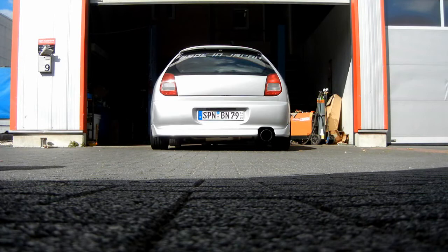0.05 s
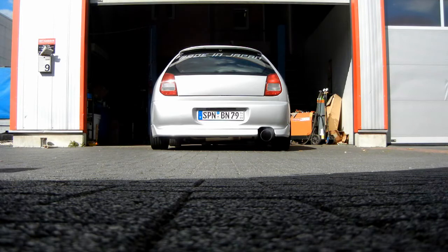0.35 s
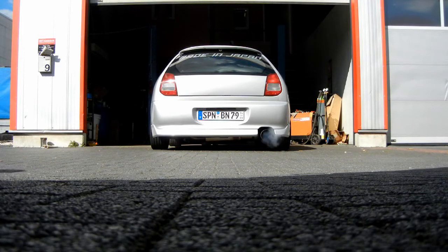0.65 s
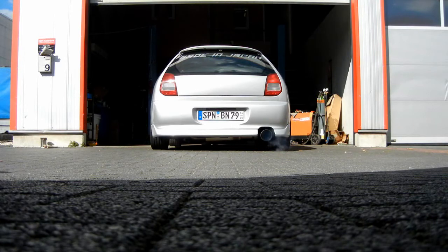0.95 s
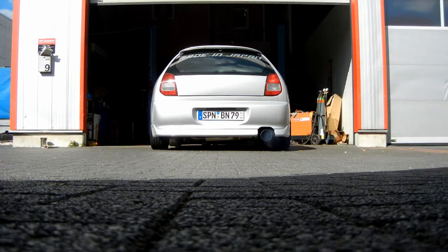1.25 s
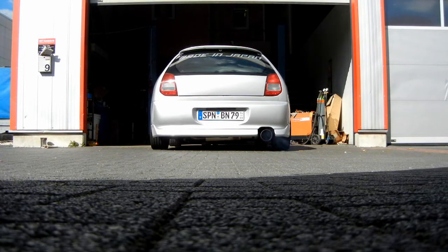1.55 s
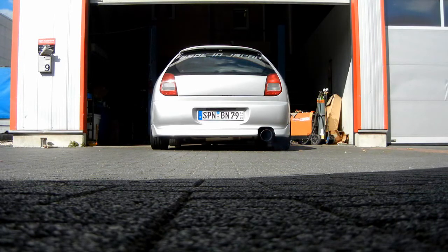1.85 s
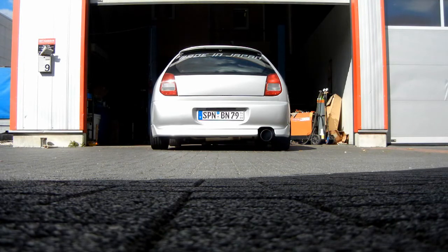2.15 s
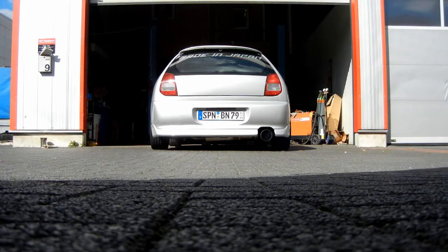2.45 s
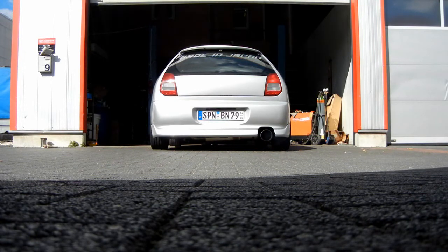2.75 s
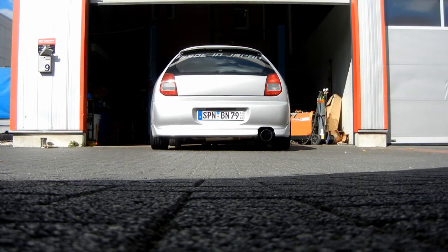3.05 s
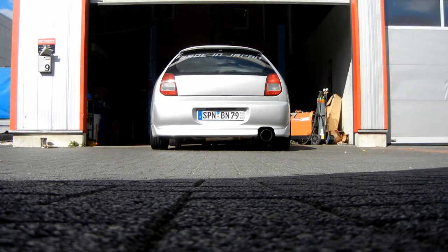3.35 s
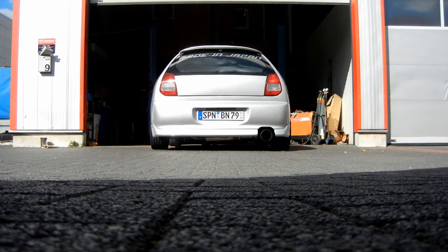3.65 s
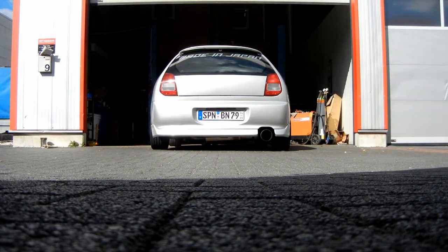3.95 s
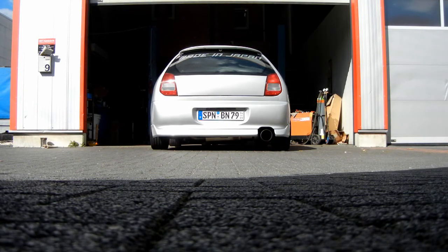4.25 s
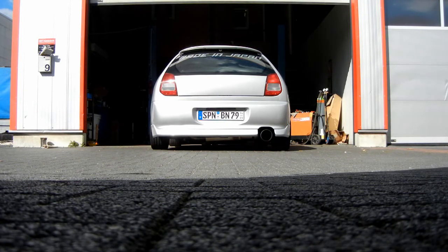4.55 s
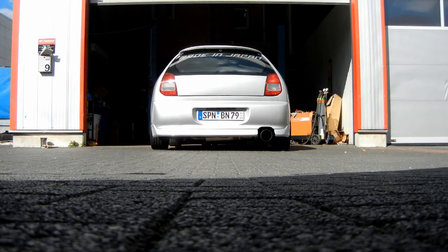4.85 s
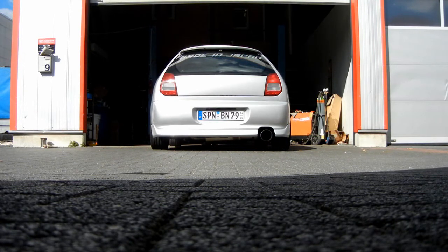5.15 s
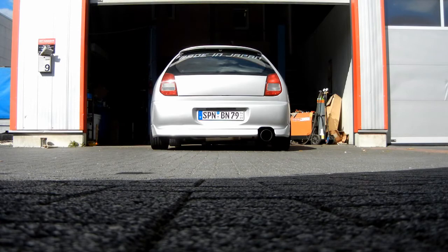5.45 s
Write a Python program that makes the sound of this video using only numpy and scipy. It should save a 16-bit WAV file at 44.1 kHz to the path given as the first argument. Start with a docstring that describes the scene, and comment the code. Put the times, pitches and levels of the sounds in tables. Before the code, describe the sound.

Heard from behind a car parked in an open garage, one quick, raspy rev rises and breaks into a cluster of exhaust pops. The boomy four-cylinder note falls slowly, stumbling a little, until it reaches an uneven idle. Then a smaller throttle blip lifts it again and it winds back down. Belts and valves whirr softly underneath, and the garage adds a brief echo.

```python
"""A car engine revs up with a hard rasp, pops and burbles down to a lumpy idle, then revs again, more gently.
It has four cylinders and a sports exhaust, and stands in an open garage with its tail towards us.
Each firing sends a puff of gas that makes the exhaust pipe ring. On the throttle the puffs steepen into
cracking shock fronts; off it, unburnt fuel pops in the pipe. The engine's whirr comes out of the garage."""
import sys
import numpy as np
from scipy import signal
from scipy.fft import rfft, irfft
from scipy.io import wavfile
from scipy.ndimage import uniform_filter1d

SR = 44100
rng = np.random.default_rng(int(sys.argv[2]) if len(sys.argv) > 2 else 0)


def unload_audio(sound):
    """Save the sound as a 16-bit wav file, at the path given as the first command line argument."""
    columns = np.transpose(np.atleast_2d(sound))
    # keep every value between -1 and 1, then stretch to whole-number steps
    steps = np.round(np.clip(columns, -1, 1) * 32767)
    wavfile.write(sys.argv[1], SR, steps.astype(np.int16))


N = 247401
TIME = np.arange(N) / SR

# Levels in the tables are relative: each part gets further gains later.
# how often the engine fires: t/s, f/Hz
FIRING_RATE = [(0.0, 50.9), (0.11, 53), (0.24, 70), (0.5, 125.5), (0.58, 134.5), (0.7, 136.5), (0.88, 124),
               (1.08, 113), (1.62, 88.4), (2.13, 72.6), (2.4, 68), (3.16, 53.4), (3.6, 50.2), (4.16, 49.2),
               (4.26, 56.9), (4.42, 85.4), (4.5, 92), (4.7, 91.5), (4.97, 84.3), (5.39, 70.3), (5.61, 69.4)]
# presses of the throttle: opens t/s, closes t/s, time to fade by 60 dB/s, opening (0-1)
THROTTLE_PRESSES = [(0.08, 0.548, 0.18, 0.93), (4.172, 4.37, 0.53, 0.8)]
# the cylinders in firing order: strength/dB, lateness/ms, change of strength at idle/dB
CYLINDERS = [(6, -0.29, 0), (-0.5, 0.39, -1.5), (5.5, -0.14, -0.5), (-0.5, 0.39, -0.5)]
# firings that fail: t/s, dip in level/dB
MISFIRES = [(1.14, -6.5), (1.203, -23.5), (1.585, -3), (1.65, -13), (5.44, -4)]
# how strong the left-right difference is against what both sides share: f/Hz, level/dB
STEREO_SPREAD = [(100, -10.5), (1000, -14), (2000, -13.5), (4000, -7.5), (8000, -4.5), (15000, -3)]
# tone colour of the valve gear and belts: f/Hz, level/dB
WHIRR_COLOUR = [(500, -24), (850, -0.5), (882, -10), (1020, -0.5), (1150, -6), (1430, -4), (1520, -2.5),
                (1760, -2), (2540, -12), (3160, -12.5), (4330, -24.5), (4830, -28), (5450, -30),
                (6870, -32.5), (15500, -45)]
# loudness of their whirr: t/s, level/dB
WHIRR_LEVEL = [(0, -41.5), (0.8, -42), (1.25, -45.5), (1.75, -40), (2.7, -43.5), (3.35, -50), (3.78, -49.5),
               (4.35, -40.5), (4.58, -48), (4.92, -39.5), (5.42, -38.5), (5.61, -46)]
# faint squeals of a belt: starts t/s, fades from t/s, level/dB
BELT_SQUEALS = [(2.384, 2.68, -65), (4.753, 5.4, -64)]
# tone colour of fast gas: f/Hz, level/dB
HISS_COLOUR = [(1000, -21), (3500, 1.5), (5600, 3.5), (6600, -4.5), (12000, -7), (13200, -8.5),
               (15500, -12)]
# loudness of the pulsing flow at the outlet: t/s, level/dB
THROB_LEVEL = [(0.1, -22), (0.38, -27.5), (0.66, -36.5), (1.14, -29.5), (1.25, -25), (2.05, -27.5),
               (2.42, -23), (2.92, -28.5), (3.11, -25), (3.65, -34), (4.26, -25), (4.38, -34.5),
               (5.15, -23), (5.61, -27)]
# tone colour of a shock front: f/Hz, level/dB
SHOCK_COLOUR = [(100, -16.5), (400, 4.5), (740, -0.5), (860, -5), (1030, 3.5), (1200, 0), (1650, 2),
                (2700, -7), (3450, -7.5), (4500, -21), (5560, -25), (6400, -37.5), (15500, -46)]
# single pops, mostly off the throttle: t/s, crack level/dB, kick to the tailpipe/dB
POPS = [(0.3136, -8.5, -2), (0.3383, -17, -6), (0.378, -4, -3), (0.7882, -7, 10), (0.8507, -20, -10),
        (0.866, -11, 0), (0.8824, -12.5, 1), (0.8984, -8.5, -6.5), (0.9313, -6, -11), (0.9986, -10.5, -4),
        (1.104, -17.5, 9), (1.1206, -12, 2), (1.1571, -21.5, 6.5), (1.1756, -12.5, 6), (1.229, -32.5, 5),
        (1.5345, -25, 9), (1.603, -43, 5.5), (1.665, -27, 2.5), (4.3117, -18, 1), (4.3669, -12, -11.5),
        (4.417, -12, -5.5), (5.355, -32, 4.5)]
# low notes at which the silencer rings (the boom): f/Hz, width/Hz, level/dB
SILENCER_MODES = [(146.8, 8.1, -4), (207.15, 11.3, 7), (288, 3.1, -10.5), (343.6, 12, -9),
                  (391.8, 4.7, -12)]
# middle notes of the tailpipe (the bark): f/Hz, width/Hz, level/dB
TAILPIPE_MODES = [(444.5, 42.3, 1.5), (468.9, 37.8, 7.5), (505, 120, -14)]
# overtones of the tailpipe (the blare): f/Hz, width/Hz, level/dB
OVERTONE_MODES = [(604, 39, -10), (720.7, 22.6, -1), (746.7, 41, -6.5)]
# loudness of the boom: t/s, level/dB
BOOM_LEVEL = [(0, -19), (0.2, -15.5), (0.4, -20.5), (0.53, -28.5), (0.6, -22.5), (1.12, -19.5), (1.3, -19),
              (1.65, -19.5), (2.14, -23), (2.22, -21), (2.5, -22), (2.68, -24.5), (2.82, -18), (3.1, -24),
              (4.22, -19), (4.4, -23.5), (4.8, -23), (5.02, -18), (5.2, -21), (5.6, -12)]
# loudness of the bark: t/s, level/dB
BARK_LEVEL = [(0.05, -34), (0.2, -19.5), (0.38, -32.5), (0.6, -18.5), (0.71, -36.5), (0.79, -30.5),
              (0.98, -18), (1.35, -48), (1.65, -27), (1.75, -21.5), (2.53, -35), (2.7, -23.5), (2.9, -42),
              (3.13, -30), (3.35, -41.5), (4.13, -34), (4.22, -24.5), (4.78, -27), (4.92, -22.5),
              (5.28, -22.5), (5.36, -18.5), (5.48, -28.5)]
# unburnt fuel crackling after the big rev: starts t/s, fades from t/s, time to fade by 60 dB/s
AFTERFIRE = (0.744, 0.95, 0.73)


def undb(db):
    """Turn decibels into a gain to multiply by."""
    return np.exp(np.asarray(db) * np.log(10) / 20)


def curve(table, at=TIME):
    """Join the points of a table with straight lines in time."""
    return np.interp(at, *np.transpose(table))


def unit(x):
    """Scale a sound so that its average level (rms) is 1."""
    return x / np.sqrt(np.mean(x ** 2))


def even_out(x, swell=0, size=3000):
    """Hold the level near 1, but keep a share (swell, 0-1) of its quick rises and falls."""
    quick, slow = (uniform_filter1d(uniform_filter1d(x ** 2, n), n // 2) + 1e-12
                   for n in (size, size * 10))
    return x / np.sqrt(quick ** (1 - swell) * slow ** swell)


def ring(x, response):
    """Pass a sound through something, given how that thing answers a single click."""
    return signal.fftconvolve(x, response)[:len(x)]


def colour(points, size=1024):
    """A click with the given tone colour (f/Hz, level/dB)."""
    hz, db = np.transpose(points)
    grid_hz = np.maximum(np.fft.rfftfreq(size, 1 / SR), 1)
    gains = undb(np.interp(np.log(grid_hz), np.log(hz), db))
    cepstrum = irfft(np.log(gains))
    # move the energy to the start of the click (minimum phase)
    cepstrum[1:size // 2] *= 2
    cepstrum[size // 2 + 1:] = 0
    return irfft(np.exp(rfft(cepstrum)))


def band(x, low_hz, high_hz, order=3):
    """Keep what lies between two frequencies."""
    return signal.sosfilt(signal.butter(order, [low_hz, high_hz], "band", fs=SR, output="sos"), x)


def pipe(x, modes):
    """A pipe rings at its own notes; neighbouring notes swing opposite ways at its mouth."""
    return sum((-1) ** k * undb(db) * signal.lfilter(*signal.iirpeak(hz, hz / width, SR), x)
               for k, (hz, width, db) in enumerate(modes))


def pulses(times, sizes, reach=8):
    """Clean clicks at exact times, even between two samples."""
    at = np.asarray(times)[:, None] * SR
    taps = np.floor(at).astype(int) + np.arange(1 - reach, reach + 1)
    shapes = np.sinc(taps - at) * np.sinc((taps - at) / reach)
    return np.bincount(np.clip(taps, 0, N - 1).ravel(), (shapes * sizes[:, None]).ravel(), N)


def wander(rate_hz):
    """A smooth random drift, about 1 in size."""
    step = int(SR / rate_hz)
    stairs = np.repeat(rng.standard_normal(N // step + 1), step)
    return unit(uniform_filter1d(stairs, step)[:N])


def envelope(start, stop, t60, rise_s=0.099):
    """Rise to 1, hold until stop, then fade by 60 dB every t60 seconds."""
    fallen_db = np.clip(60 * (TIME - stop) / t60, 0, 200)
    return np.clip((TIME - start) / rise_s, 0, 1) * undb(-fallen_db)


def around(at, half_s):
    """A smooth bump of height 1 around a moment."""
    return np.exp(-np.minimum(((TIME - at) / half_s) ** 2, 30))


def throttle():
    """How far the throttle is open, 0-1."""
    return sum(opening * envelope(start, stop, t60) for start, stop, t60, opening in THROTTLE_PRESSES)


def roughness(steady_db=2.88, throttle_db=0.1, misfire_db=2.5):
    """How much the firings vary, in dB: fuel burns less steadily on the throttle and near misfires."""
    unsettled = sum(around(at, half_s=0.07) for at, _ in MISFIRES)
    return steady_db + throttle_db * throttle() + misfire_db * unsettled


def diffuse(size):
    """Stereo noise from all around: left and right are alike in the bass, less so in the treble."""
    mid, side = rng.standard_normal((2, size))
    side = ring(side, colour(STEREO_SPREAD))
    return np.array([mid + side, mid - side])


def garage(x, early_db, early_t60, late_db, late_t60):
    """The direct sound, quick echoes off the car and the ground, and the garage's longer echo."""
    t = TIME[:SR // 2]
    early = undb(early_db) * unit(undb(-60 * t / early_t60) * (t > .0006))
    late = undb(late_db) * unit(undb(-60 * t / late_t60) * (t > .012))
    echoes = diffuse(len(t)) * np.hypot(early, late) / np.sqrt(len(t))
    return x + np.array([ring(x, side) for side in echoes])


def belt_squeal():
    """A slipping drive belt gives a faint, high squeal."""
    slipping = sum(undb(db) * envelope(start, stop, t60=.7) for start, stop, db in BELT_SQUEALS)
    return unit(band(diffuse(N), 4660, 4860, order=2)) * slipping


def pulley_whine(phase, cycles_per_firing=11.55, resonance_hz=787, width_hz=24, level_db=-45):
    """A pulley's thin tone follows the engine speed and stands out only near its resonance."""
    pitch_hz = cycles_per_firing * curve(FIRING_RATE)
    nearness = 1 / (1 + ((pitch_hz - resonance_hz) / width_hz) ** 2)
    waver_db = 5 * wander(25)
    return unit(np.sin(2 * np.pi * cycles_per_firing * phase)) * nearness * undb(level_db + waver_db)


def engine_whirr(phase, tick=0.17):
    """Valve gear and belts whirr, a little louder at every beat of the valves."""
    whirr = np.array([ring(side, colour(WHIRR_COLOUR)) for side in diffuse(N)])
    beat = 1 + tick * np.exp(-(phase % 1) / 0.31)
    flutter_db = .6 * wander(35)
    return unit(whirr * beat) * undb(curve(WHIRR_LEVEL) + 2.5 + flutter_db)


def gas_hiss(phase, intake_db=-51, intake_below_hz=67, jet_db=-34.5, jet_above_hz=110.4):
    """On the throttle, air hisses in while the engine is slow, and gas jets out once it is fast."""
    hiss = np.array([ring(side, colour(HISS_COLOUR)) for side in diffuse(N)])
    gush = 1 + 2.9 * np.exp(-(phase % 1) / 0.18)  # a surge after every firing
    intake = undb(intake_db) / (1 + (curve(FIRING_RATE) / intake_below_hz) ** 12)
    jet = undb(jet_db) / (1 + (jet_above_hz / curve(FIRING_RATE)) ** 24)
    return unit(hiss * gush) * throttle() * (intake + jet)


def throb(phase, lowest_note_hz=108, width_hz=7, octave_db=2):
    """The pulsing flow hums at the firing rate; its octave joins in near the pipe's lowest note."""
    octave = undb(octave_db) / (1 + ((2 * curve(FIRING_RATE) - lowest_note_hz) / width_hz) ** 2)
    tone = np.sin(2 * np.pi * phase) + octave * np.sin(4 * np.pi * phase)
    tone /= np.sqrt((1 + octave ** 2) / 2)
    wobble = undb(.5 * roughness() * np.tanh(wander(37)))
    rumble = undb(-23) * roughness() * unit(band(rng.standard_normal(N), 50, 140))
    return (tone * wobble + rumble) * undb(curve(THROB_LEVEL))


def lumpiness(steady=0.36, coasting=0.71, coasting_octaves_per_s=0.43):
    """How unlike each other the cylinders are: most of all while the engine slows down."""
    climb = np.gradient(np.log2(curve(FIRING_RATE)), TIME)
    sinking = uniform_filter1d(np.maximum(-climb, 0), 6000)
    return steady + coasting * np.tanh(sinking / coasting_octaves_per_s)


def firings(phase, lazy_below_hz=56, lag_ms_per_db=1.02):
    """When each firing is due, when its puff arrives and how strong it is; at idle some burn lazily."""
    count = np.arange(1, int(phase[-1]) + 1)
    times = np.interp(count, phase, TIME)
    chance = rng.standard_normal((len(count), 2))
    cylinder_db, cylinder_ms, idle_db = np.array(CYLINDERS)[count % len(CYLINDERS)].T
    lump = np.interp(times, TIME, lumpiness())
    rough_db = np.interp(times, TIME, roughness())
    lazy_db = idle_db / (1 + (curve(FIRING_RATE, times) / lazy_below_hz) ** 8)
    late_ms = lump * cylinder_ms - lag_ms_per_db * lazy_db + 0.07 * rough_db * chance[:, 0]
    strength = undb(lump * cylinder_db + lazy_db + rough_db * np.tanh(chance[:, 1]))
    return times, times + late_ms / 1000, strength


def cracks(times, rasp_db=-3.5, full_rasp_hz=110, crackle_db=-17.5, scatter_db=4.5, jitter_s=.00014):
    """Strong puffs steepen into shock fronts; fuel that burns late pops in the same way."""
    chance = np.tanh(rng.standard_normal((len(times), 2)))
    slow_db = 13 * np.log2(np.minimum(curve(FIRING_RATE) / full_rasp_hz, 1))  # weaker at low speed
    rasp = throttle() * undb(rasp_db + slow_db)
    crackle = envelope(*AFTERFIRE) * undb(crackle_db)
    sizes = np.interp(times, TIME, rasp + crackle) * undb(scatter_db * chance[:, 0])
    pop_s, pop_db, _ = np.transpose(POPS)
    pops = pulses(pop_s, undb(pop_db))
    clicks = pulses(times + jitter_s * chance[:, 1], sizes) + pops
    shape = colour(SHOCK_COLOUR)
    front = -shape[::-1] / np.abs(shape).max()  # backwards: pressure builds, then breaks off at once
    snap = undb(-19) * band(pops, 4300, 14000)  # the edge of a pop is steeper still
    return signal.fftconvolve(clicks, front)[np.argmin(front):][:N] + snap


def pop_ring(kick_db=21):
    """Every pop kicks the tailpipe and sets it ringing."""
    pop_s, _, pop_kick_db = np.transpose(POPS)
    kicks = pulses(pop_s, undb(kick_db + pop_kick_db))
    return pipe(kicks, TAILPIPE_MODES) + undb(-1.5) * pipe(kicks, OVERTONE_MODES)


def blare_gain(idle_hz=50, idle_db=-47, db_per_octave=8.5, throttle_db=-32, afterfire_db=-30):
    """The tailpipe's overtones grow with speed, on the throttle and while unburnt fuel crackles."""
    from_speed = undb(idle_db + db_per_octave * np.log2(curve(FIRING_RATE) / idle_hz))
    return from_speed + undb(throttle_db) * throttle() + undb(afterfire_db) * envelope(*AFTERFIRE)


def exhaust(phase, arrivals, strength):
    """Each puff rings the silencer and tailpipe, and swirling gas follows; a misfire leaves a hole."""
    swirl = unit(np.exp(-(phase % 1) / .5) * rng.standard_normal(N))
    flow = even_out(pulses(arrivals, strength)) + undb(-20) * roughness() * swirl
    silencer = band(pipe(flow, SILENCER_MODES), 110, 474)
    tailpipe = band(pipe(flow + undb(-17.5) * swirl, TAILPIPE_MODES), 387, 493)
    overtones = band(pipe(flow + undb(-4.5) * swirl, OVERTONE_MODES), 586, 900)
    boom = even_out(silencer, swell=.6) * undb(curve(BOOM_LEVEL))
    bark = even_out(tailpipe, swell=.99) * undb(curve(BARK_LEVEL))
    blare = even_out(overtones) * blare_gain()
    holes_db = sum(db * around(at, half_s=0.014) for at, db in MISFIRES)
    return (boom + bark + blare) * undb(holes_db)


def scene(right_db=1.88):
    """One engine speed drives the exhaust, the cracks and the whirr; the car is a little to the right."""
    phase = .5 + np.cumsum(curve(FIRING_RATE)) / SR  # goes up by 1 for each firing
    times, arrivals, strength = firings(phase)
    note = exhaust(phase, arrivals, strength) + pop_ring() + throb(phase) + pulley_whine(phase)
    note = garage(note, early_db=-20, early_t60=.05, late_db=-16, late_t60=.45)
    rasp = garage(cracks(times), early_db=-5, early_t60=.095, late_db=-15.5, late_t60=.4)
    background = engine_whirr(phase) + belt_squeal() + gas_hiss(phase)
    balance = undb(np.array([[-right_db], [right_db]]) / 2)
    return (background + note + rasp) * balance


def record(dry, ceiling=.85, top_hz=15750):
    """Round off the tallest peaks and cut the highest treble."""
    rounded = dry / (1 + (dry / ceiling) ** 8) ** (1 / 8)
    return signal.sosfilt(signal.ellip(10, .1, 80, top_hz, fs=SR, output="sos"), rounded)


dry = scene()
out = record(dry)
unload_audio(out)
```